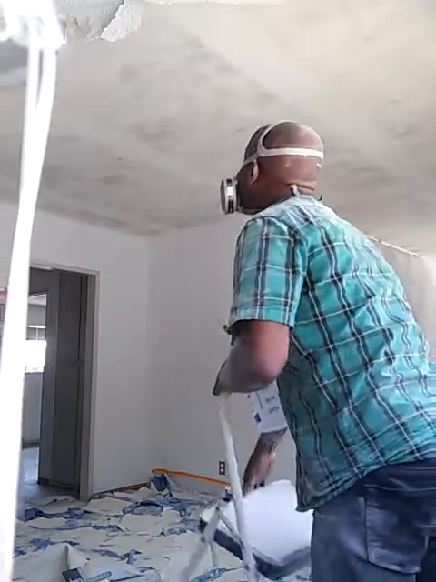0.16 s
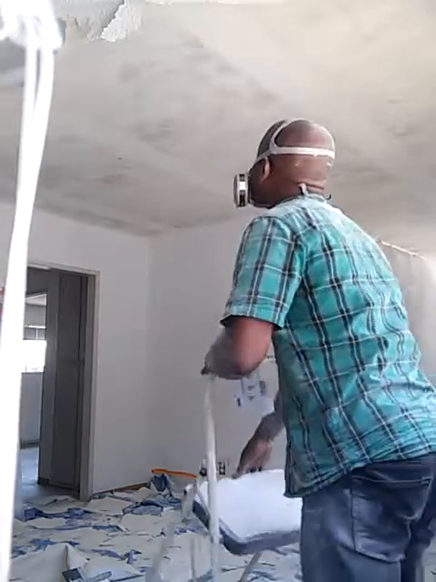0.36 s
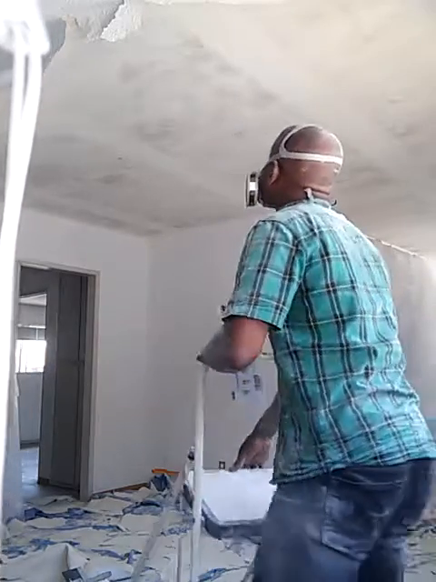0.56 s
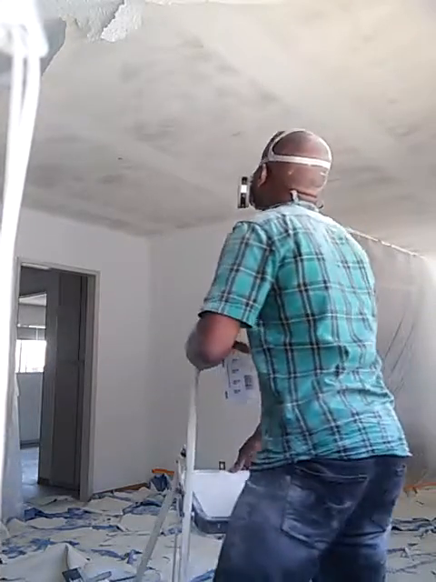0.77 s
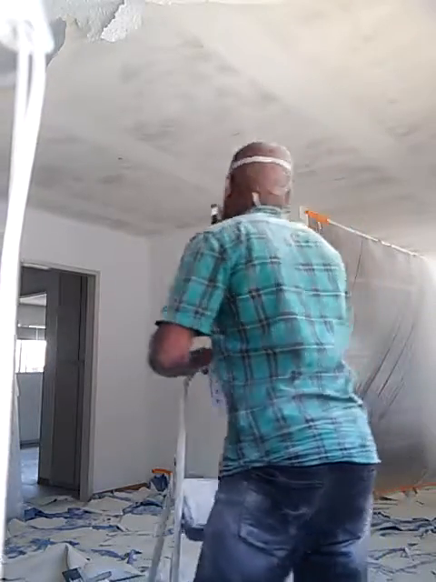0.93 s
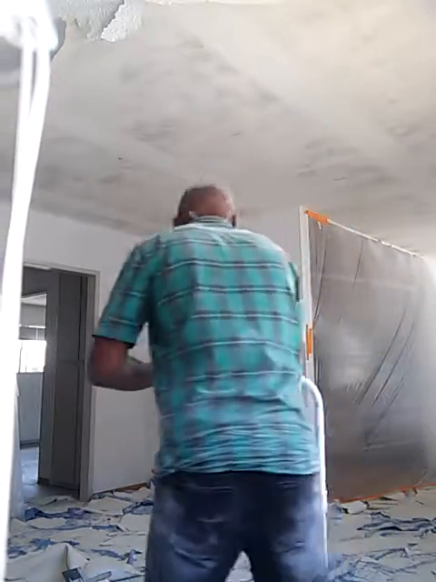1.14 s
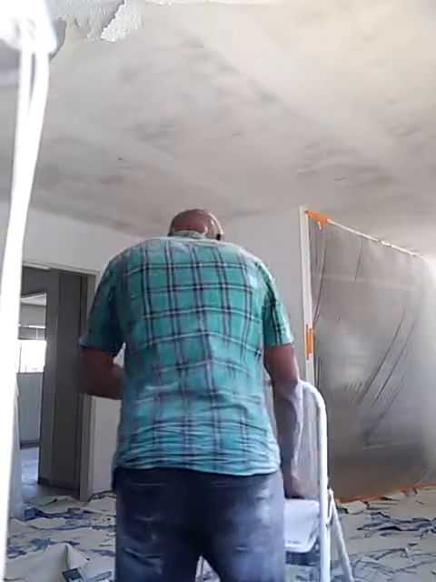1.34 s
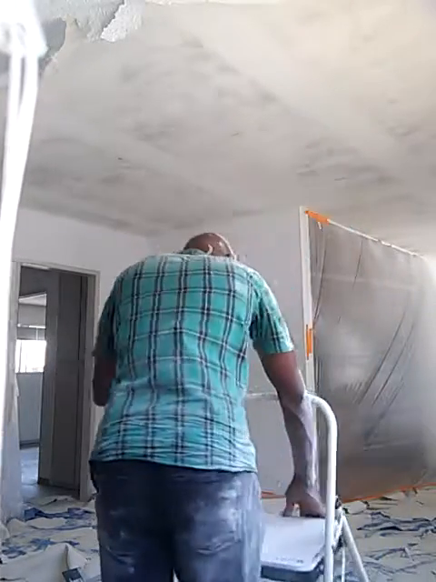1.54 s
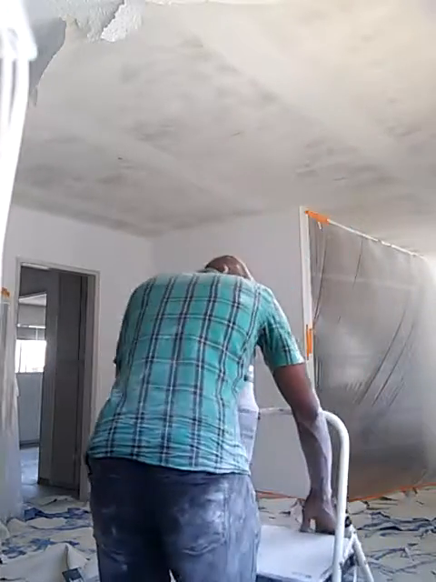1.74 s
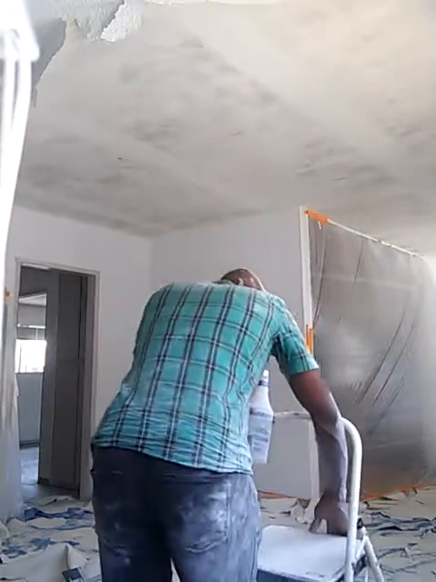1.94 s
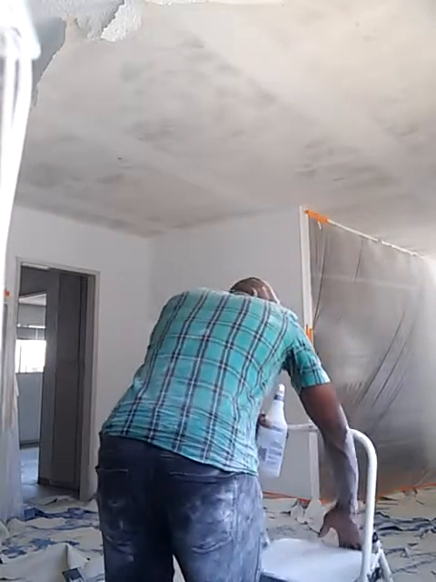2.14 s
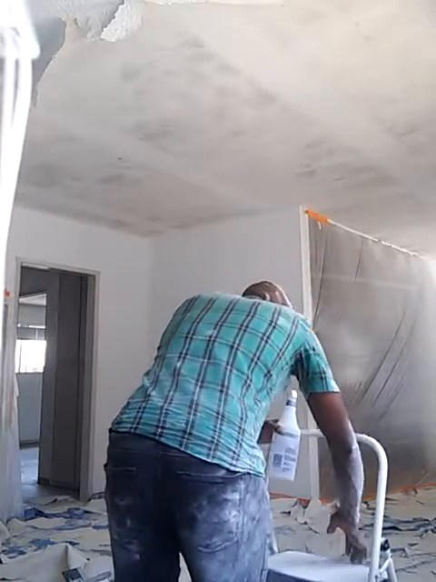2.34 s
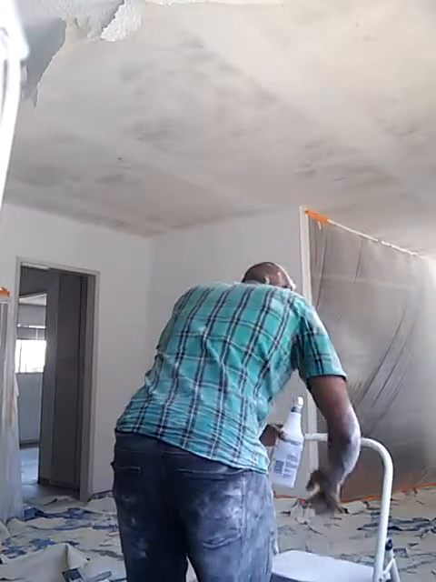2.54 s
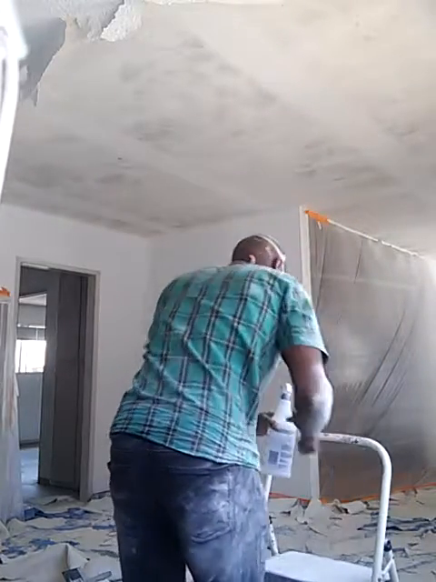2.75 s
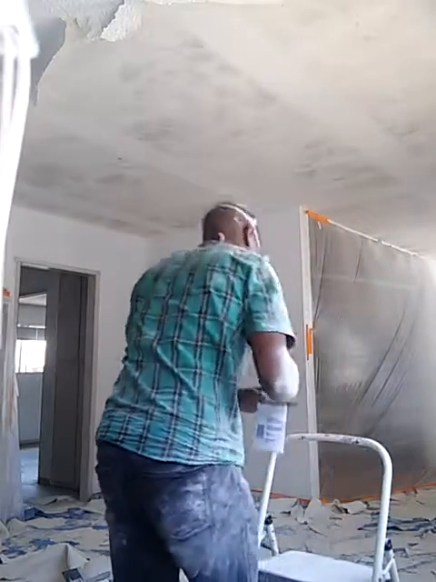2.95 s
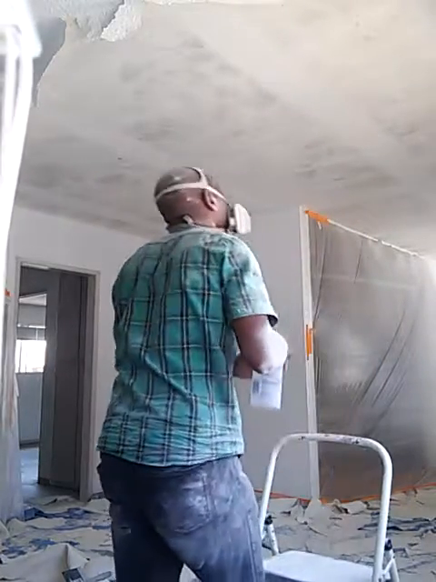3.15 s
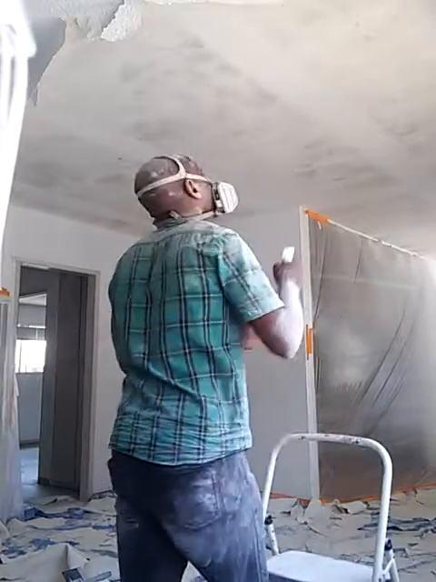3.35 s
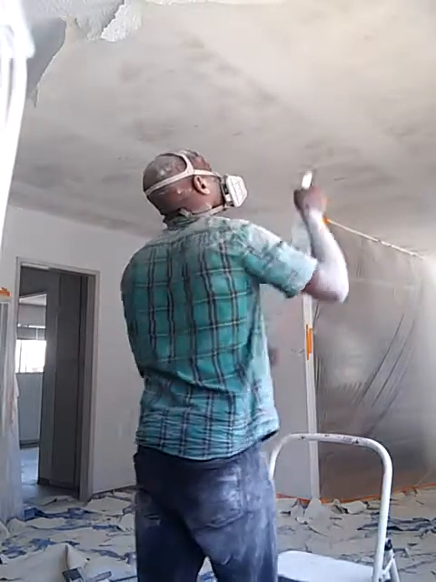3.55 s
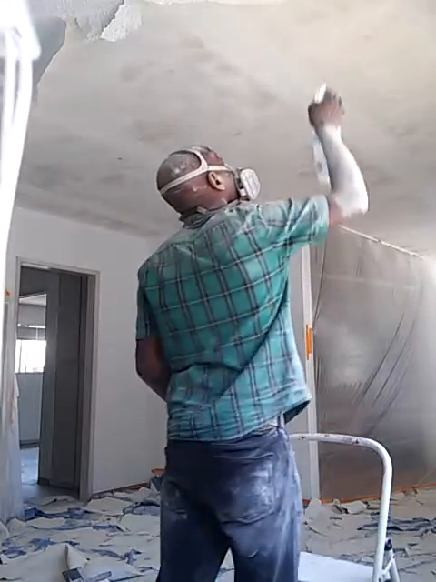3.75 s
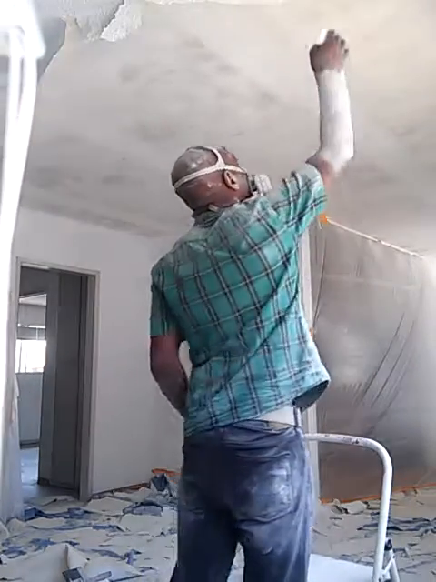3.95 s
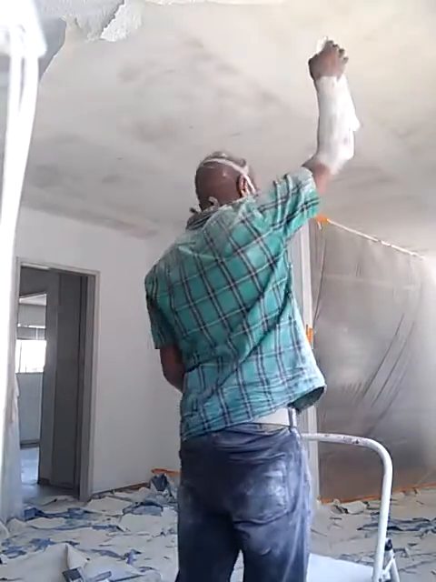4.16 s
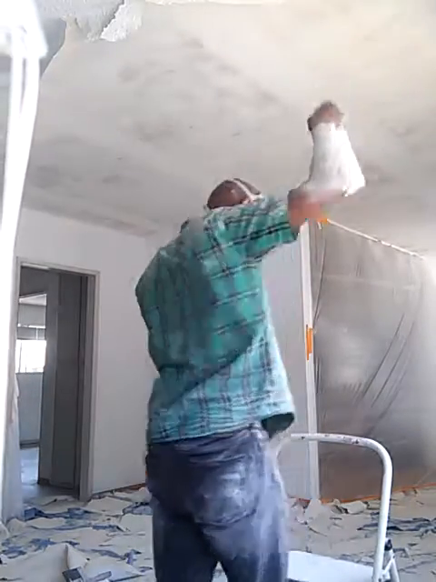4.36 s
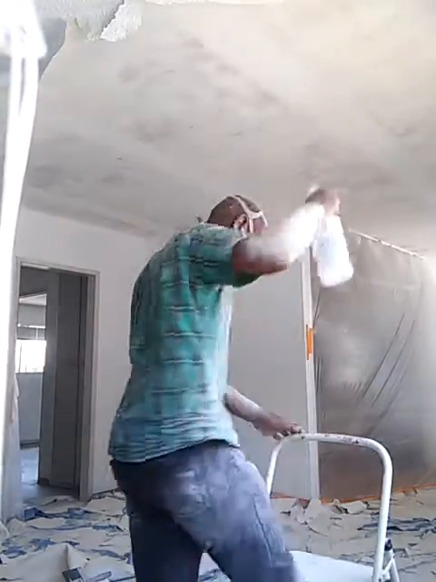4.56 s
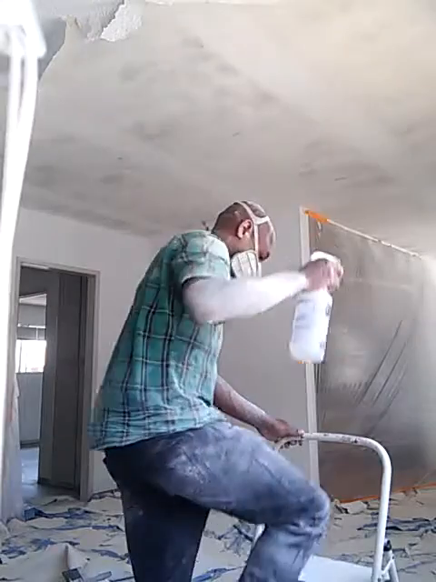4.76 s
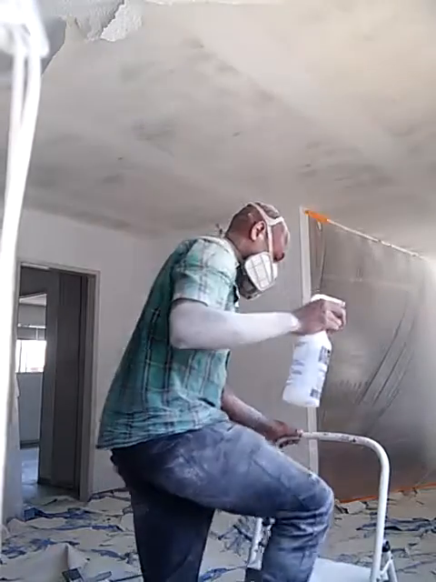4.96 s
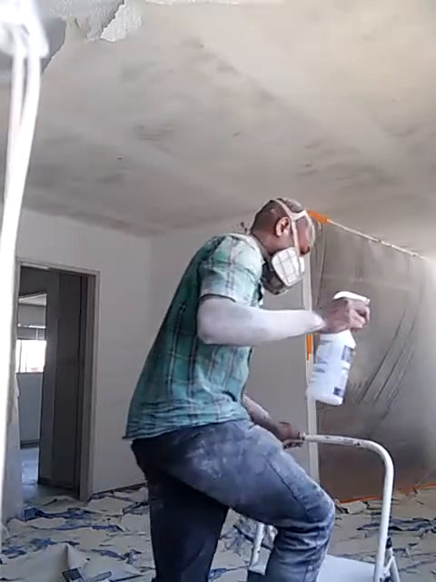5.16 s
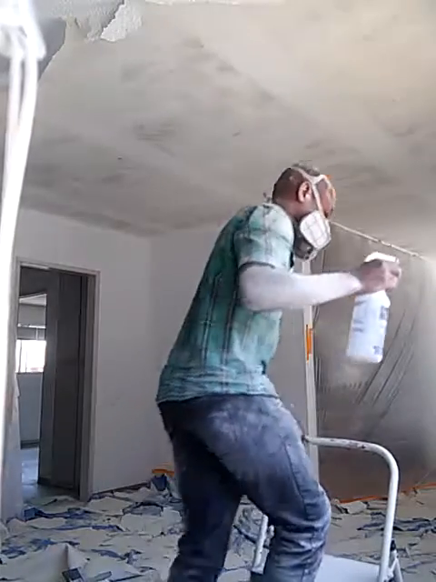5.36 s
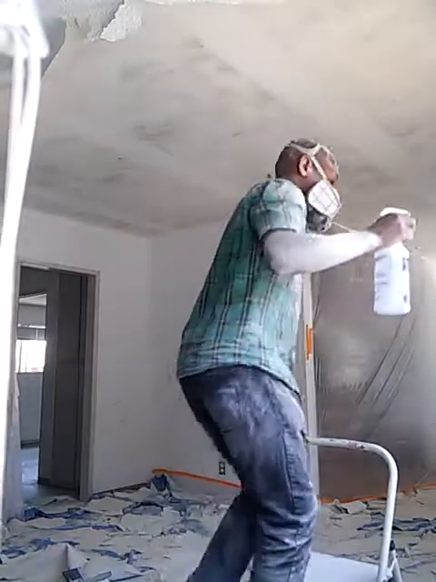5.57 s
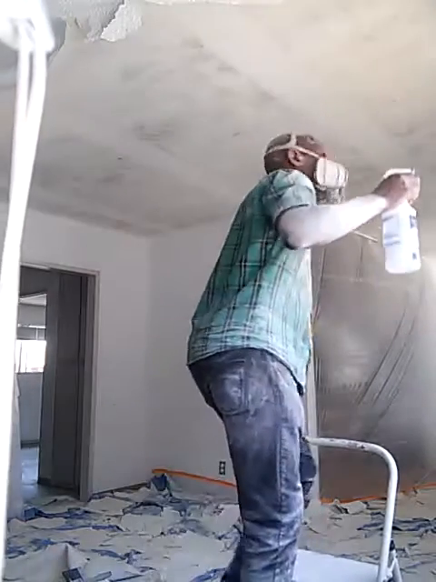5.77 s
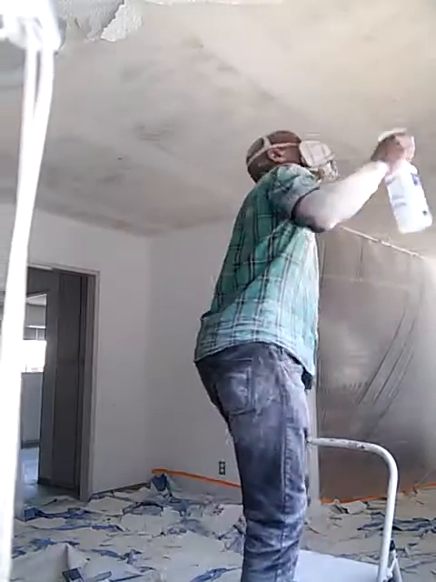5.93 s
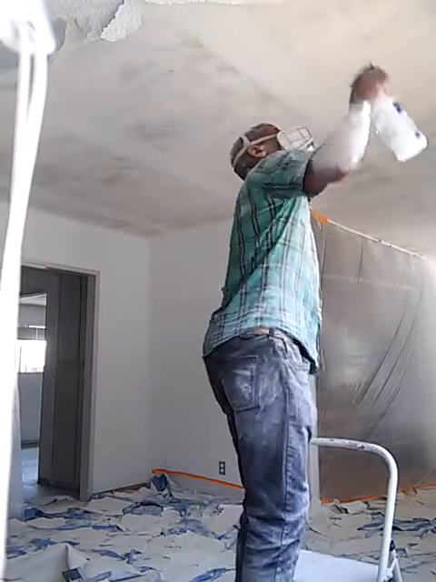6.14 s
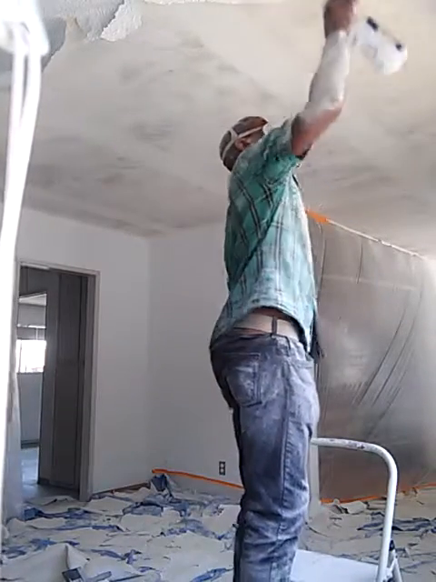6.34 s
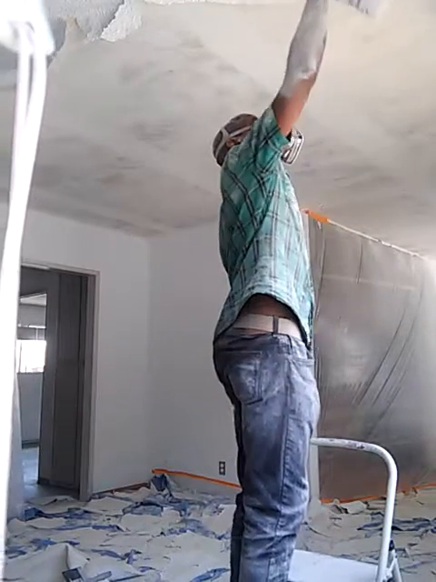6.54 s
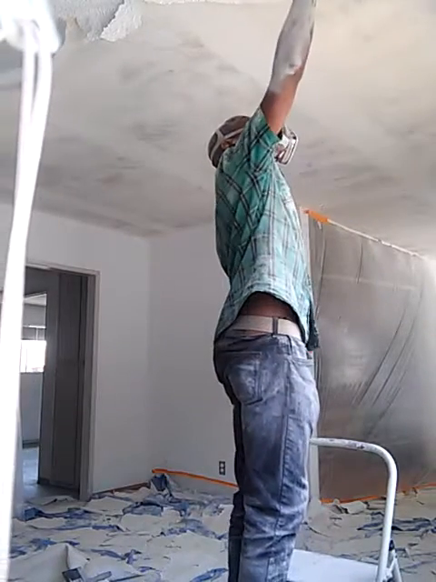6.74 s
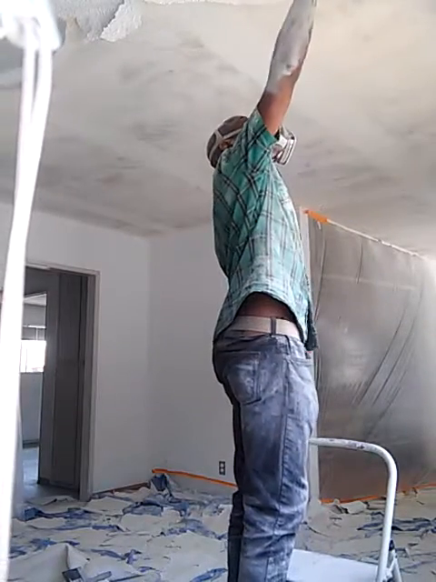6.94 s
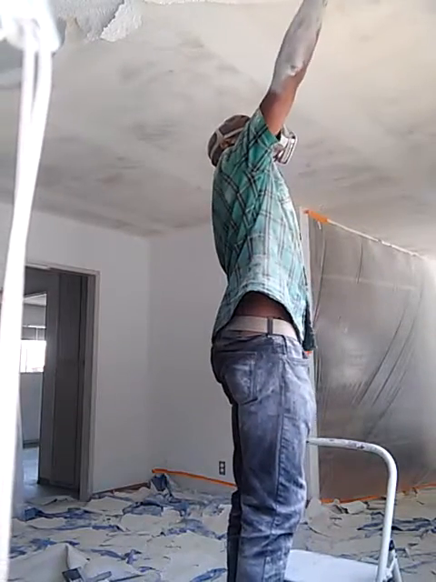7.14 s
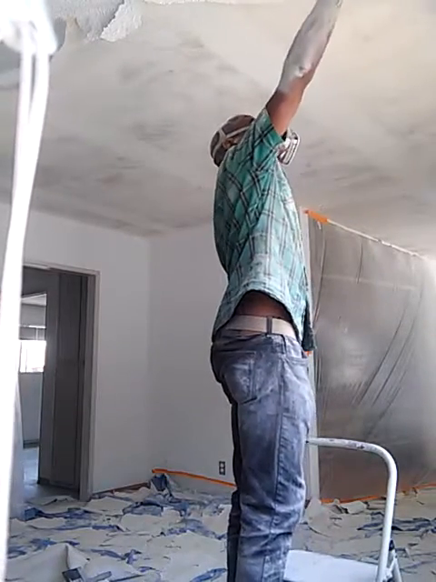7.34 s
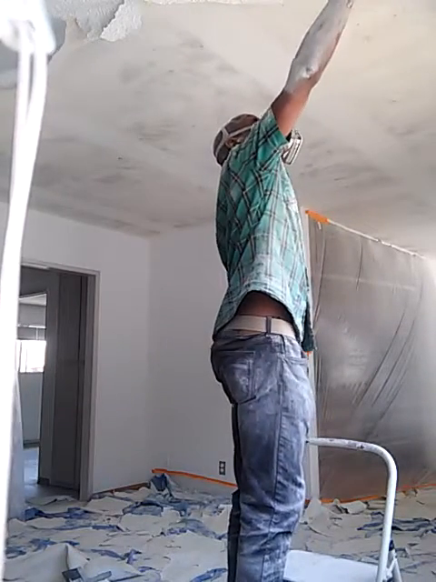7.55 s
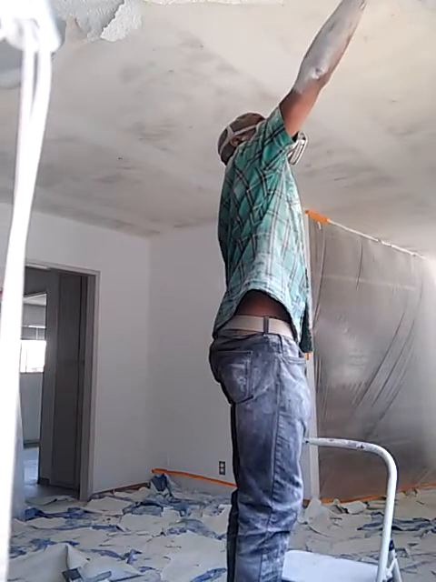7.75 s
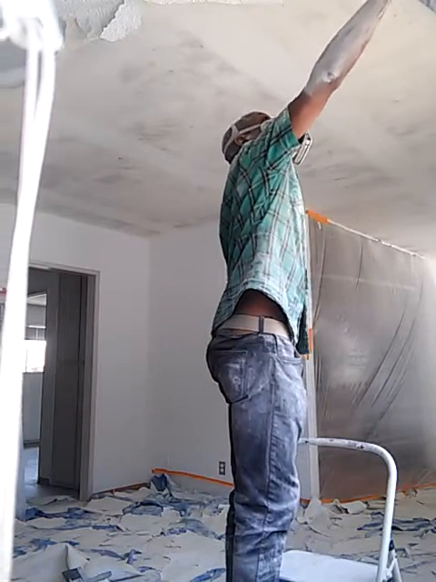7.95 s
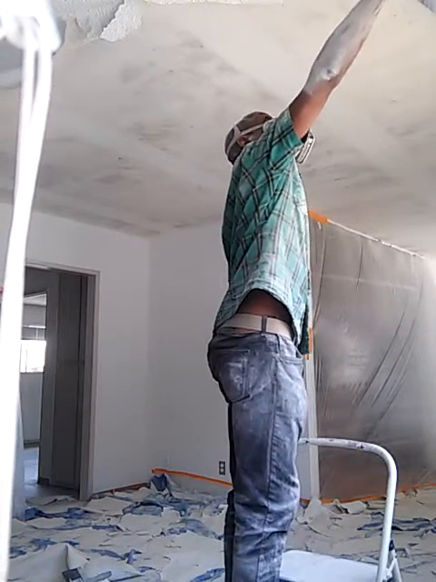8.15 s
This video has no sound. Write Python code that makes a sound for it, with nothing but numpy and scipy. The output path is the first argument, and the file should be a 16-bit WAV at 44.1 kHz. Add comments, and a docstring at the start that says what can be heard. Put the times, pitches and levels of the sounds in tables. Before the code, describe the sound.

In a bare room, a metal step ladder knocks sharply as someone moves about, then pumps a clicking, hissing spray bottle.

```python
"""A bare, echoing room under renovation, with traffic far off. First a worker shifts about: clothes rustle,
shoes scuff on debris and water sloshes in a hand-held spray bottle. After two seconds a folding steel
step ladder snaps open with two loud knocks that excite its panel and tubes; near five seconds it knocks
again as the worker climbs on. Last, the trigger is pumped: a sputter of air, four squirts of mist and
a closing puff, each begun by clicks of the plastic lever."""
import sys
import numpy as np
from scipy import signal
from scipy.fft import rfft, irfft, next_fast_len
from scipy.io import wavfile
from scipy.ndimage import uniform_filter1d

SR = 44100
rng = np.random.default_rng(int(sys.argv[2]) if len(sys.argv) > 2 else 0)


def dump_mix(stems):
    """Bounce the given channels to the path in sys.argv[1] as a 16-bit WAV at rate SR."""
    frames = np.atleast_2d(stems).T  # one column per channel
    limited = np.clip(frames, -1, 1)  # hard clip at full scale
    pcm = np.round(limited * 32767).astype(np.int16)
    wavfile.write(sys.argv[1], SR, pcm)


N = 361619
TIME = np.arange(N) / SR

# Levels are relative: each source applies its own gain. Spectra give level per unit bandwidth.
# reverberation of the room: (frequency [Hz], time to fall 60 dB [s])
ROOM_T60 = [(60, 0.82), (250, 0.49), (500, 0.54), (1000, 0.7), (2500, 0.61), (6000, 0.56), (11000, 0.43),
            (16000, 0.19)]
# response of the microphone and its port: (frequency [Hz], gain [dB])
MIC_RESPONSE = [(22, -16.5), (42, 0.5), (100, 0.5), (8800, 1), (10000, 5.5), (11000, 13), (12000, 12.5),
                (13200, 8), (15800, 2.5)]

# distant traffic: (time [s], rumble level [dB], tyre wash level [dB])
TRAFFIC_LEVELS = [(0, -59.5, -57.5), (.9, -63, -60.5), (2.0, -61, -55.5), (3.0, -53.5, -55.5),
                  (5.4, -50, -55), (6.5, -55.5, -56), (7.4, -53, -51.5), (8.2, -53.5, -53.5)]
# traffic rumble: (frequency [Hz], level [dB])
RUMBLE_SPECTRUM = [(20, -52), (33, -31), (50, -14.5), (65, -2.5), (82, -4.5), (98, -5.5), (125, 4.5),
                   (165, -8.5), (230, -13), (400, -22.5), (1000, -52)]
# tyre wash: (frequency [Hz], level [dB])
TYRE_SPECTRUM = [(150, -6), (450, -8), (600, -4), (800, 2), (1000, 2), (1300, -6.5), (2000, -16),
                 (4000, -27.5), (8000, -24.5), (16000, -25.5)]
# far engines: (time [s], hum level [dB], drone level [dB])
ENGINE_LEVELS = [(0, -72, -72), (1.6, -57.5, -67.5), (3.6, -52, -57), (4.3, -59.5, -60), (4.8, -72, -64.5),
                 (6.6, -72, -61), (7.3, -60, -61), (8.2, -74, -52)]

# weight coming down on the floor: (time [s], level [dB])
FOOTFALLS = [(.27, -49), (1.17, -47.5), (2.235, -36), (5.15, -52), (5.33, -42.5), (7.25, -47)]
# boom of the floor: (frequency [Hz], level [dB])
FLOOR_SPECTRUM = [(28, -22), (52, -3.5), (80, -1), (120, -5), (200, -27), (500, -60.5)]
# the worker shifts, reaches or steps: (start [s], rise [s], hold [s], swish level [dB], scuff level [dB])
MOVES = [(0.417, 0.026, 0.043, -38, -39), (.5, 0.047, 0.1, -52, -66), (1.012, 0.045, 0.063, -37, -41),
         (1.242, 0.036, .01, -48, -55.5), (1.553, 0.033, 0.042, -43.5, -57.5),
         (1.622, 0.045, 0.021, -50, -47), (1.92, .04, .1, -63.5, -76.5), (2.085, 0.14, 0.0092, -47, -79),
         (2.802, 0.033, 0.046, -42.5, -46.5), (3.072, 0.023, 0.029, -37.5, -55.5),
         (3.193, 0.24, .015, -33, -44), (3.465, 0.048, .06, -40.5, -47.5),
         (3.612, 0.048, 0.0086, -34.5, -48), (3.757, 0.057, 0.23, -58.5, -78),
         (4.094, 0.19, 0.012, -43.5, -59.5), (4.259, 0.041, 0.08, -52, -41.5),
         (4.544, 0.077, 0.32, -48.5, -71), (5.448, 0.036, .005, -40, -69), (5.719, 0.086, 0.14, -45, -54),
         (5.96, 0.038, 0.024, -54, -63), (6.15, 0.065, 0.13, -55.5, -69), (6.548, .04, 0.011, -55, -60.5)]
# rubbing cloth: (frequency [Hz], level [dB])
CLOTH_SPECTRUM = [(300, -28.5), (2500, -24), (5000, -10.5), (8000, -3.5), (11000, -2), (16000, -0.5)]
# soles on grit: (frequency [Hz], level [dB])
SCUFF_SPECTRUM = [(100, -23.5), (500, -15.5), (900, -2), (1400, -4.5), (1900, 1), (2700, -0.5), (3400, -7),
                  (5500, -4), (9000, -11.5), (16000, -16.5)]
# hinges, soles and plastic: (start [s], end [s], level [dB], frequency [Hz], bandwidth [Hz])
SQUEAKS = [(0.013, 0.05, -62.5, 3900, 600), (0.163, 0.404, -68, 2100, 200), (0.268, 0.36, -57, 1500, 700),
           (.412, 0.475, -38, 1260, 910), (.431, 0.484, -47, 527, 260), (.436, 0.48, -38, 2820, 2400),
           (1.023, 1.09, -55, 2540, 900), (2.122, 2.265, -45, 1480, 317), (3.385, 3.47, -49.5, 4300, 1500),
           (3.392, 3.576, -55.5, 2300, 600), (6.69, 7.023, -58.5, 2600, 380),
           (7.134, 7.145, -45.5, 4140, 650), (7.444, 7.48, -47.5, 2036, 900)]

# larger single bubbles: (time [s], level [dB], frequency [Hz])
GLUGS = [(0.42, -25.5, 1003), (1.435, -31, 1264), (2.885, -20.5, 1140), (2.889, -25, 774)]
# swings of the bottle: (start [s], end [s], level [dB], bubble frequency [Hz])
SLOSHES = [(.248, 0.408, -60, 966), (1.169, 1.292, -52, 1344), (1.175, 1.69, -54.5, 878),
           (1.426, 1.535, -51.5, 1290), (3.051, 3.171, -52, 827), (3.219, 3.322, -50, 1310),
           (5.756, 6.043, -55, 960), (7.057, 7.102, -53.5, 932), (7.23, 7.313, -48, 805),
           (7.436, 7.554, -50, 1060)]

# blows on the ladder:
# (time [s], clatter level [dB], thud level [dB], thud frequency [Hz], crack level [dB], rise [s])
LADDER_KNOCKS = [(2.205, -27, -54, 900, -28, 0.038), (2.234, -27.5, -21, 587, -27.5, 0.00068),
                 (2.24, -39.5, -23, 152.3, -41, 0.0031), (2.27, -31.5, -28, 640, -26.5, 0.0035),
                 (2.365, -35, -36, 1290, -29, 0.017), (2.432, -12, -21, 400, -14, 0.0013),
                 (2.462, -19.5, -18.5, 300, -10, 0.0097), (2.497, -23, -22, 260, -22, 0.0029),
                 (5.1, -44.5, -32.5, 1150, -47, 0.016), (5.122, -41, -31.5, 1200, -44, 0.0034),
                 (5.144, -29, -20, 736, -20.5, 0.0082), (5.16, -27, -26.5, 360, -24, 0.0056),
                 (5.31, -32.5, -30.5, 344, -36, 0.0059), (5.316, -51, -35.5, 150, -55, .004),
                 (5.32, -38, -25, 1026, -42, 0.0057), (5.337, -54, -33, 485, -50, 0.0023)]
# rattling joints: (frequency [Hz], level [dB])
CLATTER_SPECTRUM = [(30, -47.5), (60, -24), (180, -10.5), (260, -6.5), (450, -0.5), (1000, 3), (1600, 1),
                    (3000, -4), (5500, -8), (8500, -10), (12000, -13), (16000, -25)]
# steel striking steel: (frequency [Hz], level [dB])
CRACK_SPECTRUM = [(2000, -32.5), (4500, -15.5), (6000, 5), (8500, -6), (11000, -4.5), (14000, -4.5),
                  (16000, -5.5)]
# modes of the step panel: (frequency [Hz], bandwidth [Hz], gain [dB])
PANEL_MODES = [(83.5, 16, 12.5), (271, 7.2, 7.5), (380, 7.9, 5), (420, 21, 12.5), (490, 8.4, -11),
               (608, 25, -6)]
# modes of the steel tubes: (frequency [Hz], bandwidth [Hz], gain [dB])
TUBE_MODES = [(1976, 22, -4), (3840, 54, -2.5), (6170, 130, -4.5), (6140, 260, -1.5), (10690, 140, -3),
              (14020, 220, -3)]

# trigger squeezes: (press [s], nozzle delay [s], release [s], air level [dB], mist level [dB])
SQUEEZES = [(6.62, .0005, 6.675, -29.5, -55), (6.807, 0.00077, 6.82, -33, -64),
            (6.914, .001, 7.15, -40, -44), (7.2056, 0.012, 7.37, -40, -33.5),
            (7.517, 0.013, 7.697, -36, -32), (7.87, 0.011, 8.042, -37, -32.5),
            (8.19, .001, 8.226, -38, -60)]
# distinct snaps of the plastic: (time [s], level [dB], decay [s])
PLASTIC_SNAPS = [(.021, -37.5, 0.01), (4.637, -18.5, 0.0029), (6.6425, -13.5, 0.0047), (6.9602, -3, .0013),
                 (6.977, -9, 0.0031), (7.1728, -21, .001), (7.2198, -7, 0.0014), (7.5466, -0.5, 0.0014),
                 (7.8847, -5.5, 0.0012)]
# clicks of the lever: (frequency [Hz], level [dB])
CLICK_SPECTRUM = [(500, -18.5), (2500, -12), (4000, -16), (5500, -11.5), (7500, -3), (9500, -8),
                  (12000, -8), (15000, 1.5)]
# air leaving the nozzle: (frequency [Hz], level [dB])
AIR_SPECTRUM = [(500, -50), (1500, -36), (3500, -13.5), (5500, -2), (8000, -3.5), (11000, -2), (15000, 4)]
# mist leaving the nozzle: (frequency [Hz], level [dB])
MIST_SPECTRUM = [(200, -51), (800, -6.5), (1400, -7.5), (2200, 1), (3200, -1), (5200, 1), (8500, -2),
                 (12000, -7.5), (16000, -0.5)]


def from_db(db):
    """Amplitude grows tenfold for every 20 dB."""
    return 10 ** (np.asarray(db) / 20)


def unit_rms(x):
    """Normalisation to unit mean power."""
    return x / np.sqrt(np.mean(x ** 2) + 1e-20)


def at_hz(points, hz):
    """Interpolation on a logarithmic frequency axis."""
    frequencies, values = np.transpose(points)
    return np.interp(np.log(np.maximum(hz, 1)), np.log(frequencies), values)


def colour(x, spectrum):
    """Linear filtering is multiplication in the frequency domain."""
    size = next_fast_len(N + SR // 10)
    gain = from_db(at_hz(spectrum, np.arange(size // 2 + 1) * SR / size))
    return irfft(rfft(x, size) * gain, size)[:N]


def flicker(depth_db, samples):
    """Log-normal modulation: a random gain correlated over the given number of samples."""
    return from_db(depth_db * unit_rms(uniform_filter1d(rng.standard_normal(N), size=samples)))


def noise(spectrum, envelope=1, grain_db=0):
    """Source and filter: enveloped noise, in millisecond grains of uneven size, is given a spectrum."""
    grains = flicker(grain_db, samples=44)
    excitation = unit_rms(rng.standard_normal(N) * grains) * envelope
    power = np.mean(from_db(at_hz(spectrum, np.arange(SR // 2))) ** 2)
    return colour(excitation, spectrum) / np.sqrt(power)


def band_noise(hz, width):
    """Narrow-band noise has a pitch at its centre frequency; one second at unit rms."""
    low = np.hypot(hz, width / 2) - width / 2
    sos = signal.butter(2, [low, low + width], "band", fs=SR, output="sos")
    return unit_rms(signal.sosfilt(sos, rng.standard_normal(2 * SR))[SR:])


def resonate(x, modes):
    """Modal superposition: damped two-pole resonators respond in parallel."""
    out = np.zeros(N)
    for hz, width, gain_db in modes:
        radius = np.exp(-np.pi * width / SR)
        feedback = [1, -2 * radius * np.cos(2 * np.pi * hz / SR), radius ** 2]
        out += from_db(gain_db) * (1 - radius ** 2) / 2 * signal.lfilter([1, 0, -1], feedback, x + 1e-18)
    return out


def add(track, start, sound):
    """Superposition of a short sound on a track, from a start time in seconds."""
    i = int(np.clip(start * SR, 0, N - 1))
    track[i:i + len(sound)] += sound[:N - i]


def impact(rise, decay):
    """Envelope of a damped contact: quick growth, then exponential decay."""
    t = TIME[:SR]
    return (1 - np.exp(-t / rise)) * np.exp(-np.minimum(t / decay, 40))


def arch(start, end, roundness):
    """Envelope of a stroke that builds and eases: a half sine raised to a power."""
    length = int(np.clip((end - start) * SR, 2, SR))
    return np.abs(np.sin(np.linspace(0, np.pi, length))) ** roundness


def gesture(rise, hold, settle_s=0.048):
    """Envelope of a movement: power-law growth, a plateau, exponential relaxation."""
    t = TIME[:SR]
    return np.minimum(t / rise, 1) ** 1.6 * np.exp(-np.maximum(t - rise - hold, 0) / settle_s)


def reverberation(x, build_s=0.0011):
    """A diffuse field between bare walls decays exponentially, each band at its own rate."""
    t, hz = TIME[:SR], np.arange(SR // 2 + 1)
    white, tail = rfft(rng.standard_normal(SR)), np.zeros(SR)
    onset = 1 - np.exp(-t / build_s)
    edges = np.geomspace(420, SR / 2, 61) - 400
    for low, high in zip(edges, edges[1:]):
        band = irfft(white * ((hz >= low) & (hz < high)), SR)
        band *= onset * from_db(-60 * t / at_hz(ROOM_T60, np.sqrt(low * high)))
        tail += band * np.sqrt((high - low) / (SR / 2) / np.sum(band ** 2))   # equal energy per hertz
    return signal.fftconvolve(x, tail)[:N]


def reflections(x, count=4, shift_s=0.014):
    """Moving sources change their echo paths: the sound crossfades round a cycle of room responses."""
    out = np.zeros(N)
    for k in range(count):
        distance = np.abs((TIME / shift_s - k) % count - count / 2)
        out += reverberation(x * np.cos(np.pi / 2 * np.minimum(distance, 1)))
    return out


def traffic(hum_hz=82, drone_hz=152):
    """Incoherent distant sources add: broadband rumble and tyre wash, narrow-band engine hum and drone."""
    times, rumble_db, tyre_db = np.transpose(TRAFFIC_LEVELS)
    out = from_db(np.interp(TIME, times, rumble_db) - 0.5) * noise(RUMBLE_SPECTRUM)
    out += from_db(np.interp(TIME, times, tyre_db)) * noise(TYRE_SPECTRUM)
    times, hum_db, drone_db = np.transpose(ENGINE_LEVELS)
    for level_db, hz, width_hz in ((hum_db, hum_hz, 8), (drone_db, drone_hz, 45)):
        mode = [(hz, width_hz, 0)]
        engine = resonate(resonate(rng.standard_normal(N), mode), mode)
        out += from_db(np.interp(TIME, times, level_db)) * unit_rms(engine)
    return out


def floor():
    """Structure-borne sound: a sudden load sets the floor booming at low frequencies."""
    load = np.zeros(N)
    for start, level_db in FOOTFALLS:
        add(load, start, from_db(level_db) * impact(rise=0.015, decay=0.14))
    return noise(FLOOR_SPECTRUM, load)


def clothes_and_shoes(restless_from_s=1.2):
    """Friction noise: cloth rubs with a fine hiss; soles grind coarser grit and catch unevenly."""
    swish = from_db(-62.5) * (TIME > restless_from_s)   # once on the move, the shirt never quite rests
    scuff = np.zeros(N)
    for start, rise, hold, swish_db, scuff_db in MOVES:
        shape = gesture(rise, hold)
        add(swish, start, from_db(swish_db) * shape)
        add(scuff, start, from_db(scuff_db) * shape)
    catch = flicker(1.5, samples=700)
    cloth = swish * noise(CLOTH_SPECTRUM, grain_db=1.5)
    soles = scuff * catch * noise(SCUFF_SPECTRUM, grain_db=1.0)
    return from_db(-7.5) * cloth + from_db(-1.48) * soles


def squeaks():
    """Stick-slip friction: rubbing parts slip unevenly and sound in one resonance each."""
    out = np.zeros(N)
    for start, end, level_db, hz, width in SQUEAKS:
        shape = arch(start, end, roundness=0.45)
        add(out, start, from_db(level_db) * shape * band_noise(hz, width)[:len(shape)])
    return out


def bubble(hz, decay_cycles=6.2, glide=0.047):
    """An air pocket in water is a damped mass-spring oscillator; its pitch rises as it rings."""
    cycles = hz * TIME[:SR // 12]
    age = cycles / decay_cycles
    phase = 2 * np.pi * cycles * (1 + glide * np.tanh(age / 2))
    return np.sin(phase) * np.exp(-age) * (1 - np.exp(-cycles))


def water(bubbles_per_s=300, spread_octaves=0.1):
    """Air entrainment: each swing of the bottle stirs up similar small bubbles; a few larger ones glug."""
    out = np.zeros(N)
    for start, level_db, hz in GLUGS:
        add(out, start, from_db(level_db - 3) * bubble(hz))
    for start, end, level_db, hz in SLOSHES:
        swarm, shape = np.zeros(2 * SR), arch(start, end, roundness=0.11)
        for delay, detune in zip(rng.random(bubbles_per_s), rng.standard_normal(bubbles_per_s)):
            add(swarm, delay, bubble(hz * 2 ** (spread_octaves * np.clip(detune, -2, 2))))
        add(out, start, from_db(level_db - 0.5) * shape * unit_rms(swarm[:SR])[:len(shape)])
    return out


def ladder(thud_width_ratio=0.51, ring_exponent=1.21):
    """Impact excitation: blows thud and crack, loose joints drive the panel's modes, and the tubes ring."""
    rattle, strike, ringing, thuds = np.zeros((4, N))
    for start, clatter_db, thud_db, thud_hz, crack_db, rise in LADDER_KNOCKS:
        shape = impact(rise, decay=0.022)
        add(rattle, start, from_db(clatter_db) * shape)
        add(strike, start, from_db(crack_db) * shape)
        add(ringing, start, from_db(ring_exponent * crack_db) * shape)   # hard blows ring out of proportion
        add(thuds, start, from_db(thud_db) * shape * band_noise(thud_hz, thud_hz * thud_width_ratio))
    clatter = noise(CLATTER_SPECTRUM, rattle, grain_db=7.5)
    panel = resonate(clatter, PANEL_MODES)
    tubes = resonate(rng.standard_normal(N) * ringing, TUBE_MODES)
    cracks = noise(CRACK_SPECTRUM, strike)
    return from_db(2.3) * clatter + thuds + panel + from_db(-7) * cracks + from_db(11) * tubes


def tick_run(start, every_s, level_db, decay_s, count=2, jitter=0.25, spread_db=2.5):
    """Irregular slips give ticks of uneven timing and strength: (time [s], level [dB], decay [s])."""
    return [(start + every_s * (k + 1 + jitter * late), level_db + spread_db * hard, decay_s)
            for k, (late, hard) in enumerate(rng.standard_normal((count, 2)))]


def trigger(rise_s=0.00036, decay_s=0.0016):
    """Brief contacts radiate broadband clicks: the lever takes up slack, sticks and slips, springs back."""
    ticks, envelope = list(PLASTIC_SNAPS), np.zeros(N)
    for press, _, release, _, _ in SQUEEZES:
        ticks.append((press, -12, decay_s))
        ticks += tick_run(press, every_s=0.011, level_db=-11, decay_s=decay_s)
        ticks += tick_run(release, every_s=0.028, level_db=-23.5, decay_s=decay_s)
    for start, level_db, decay in ticks:
        add(envelope, start, from_db(level_db) * impact(rise_s, decay))
    return from_db(-10) * noise(CLICK_SPECTRUM, envelope)


def nozzle():
    """Jet noise follows the pressure of each squeeze: thin air hiss, then broader mist once primed."""
    air, mist = np.zeros((2, N))
    for press, delay, release, air_db, mist_db in SQUEEZES:
        start = press + delay
        add(air, start, from_db(air_db) * arch(start, release, roundness=0.34))
        add(mist, start, from_db(mist_db) * arch(start, release, roundness=1.1))
    return noise(AIR_SPECTRUM, air, grain_db=-1.0) + noise(MIST_SPECTRUM, mist)


def scene():
    """Direct and reverberant fields add; the ladder drives the room most strongly, the worker least."""
    steel, worker = ladder(), clothes_and_shoes()
    slosh_and_squeak = water() + from_db(0.5) * squeaks()
    lever, spray = trigger(), nozzle()
    direct = from_db(1.5) * steel + worker + slosh_and_squeak + lever + from_db(1.5) * spray
    to_room = (from_db(1.5) * steel + from_db(-8) * worker + from_db(-1) * slosh_and_squeak
               + from_db(-1.5) * lever + from_db(-3.5) * spray)
    return (direct + reflections(to_room) + floor() + traffic())[None]


def record(dry, cutoff_hz=15950):
    """Port resonance in the microphone lifts the top octave; saturation rounds peaks; a low-pass follows."""
    rounded = np.tanh(colour(dry[0], MIC_RESPONSE))
    low_pass = signal.ellip(12, 0.2, 80, cutoff_hz, fs=SR, output="sos")
    return signal.sosfilt(low_pass, rounded)[None]


dry = scene()
out = record(dry)
dump_mix(out)
```